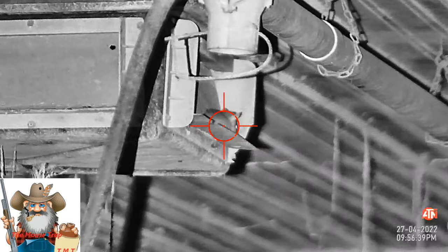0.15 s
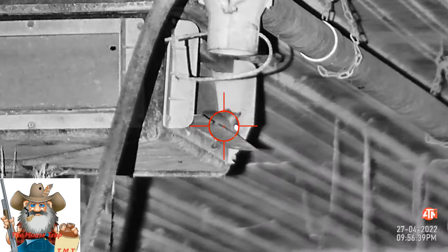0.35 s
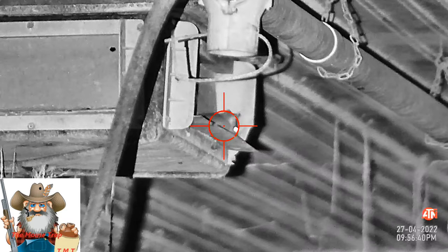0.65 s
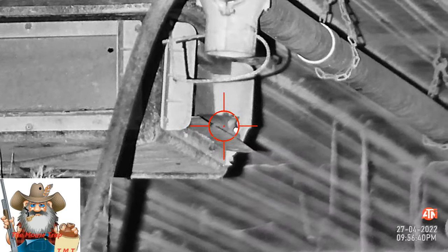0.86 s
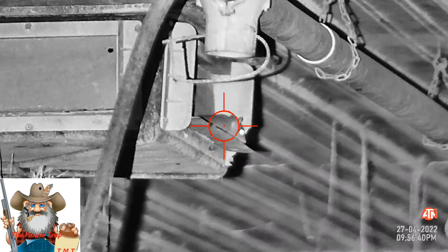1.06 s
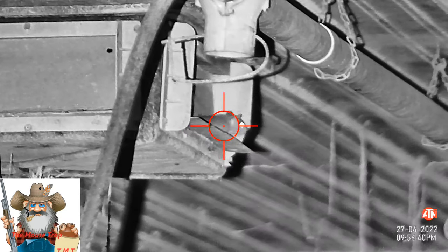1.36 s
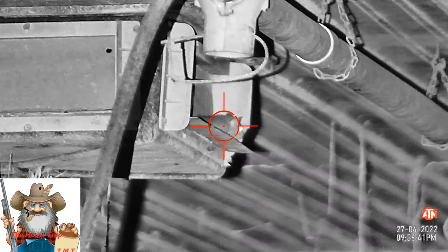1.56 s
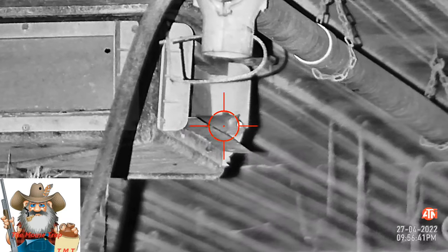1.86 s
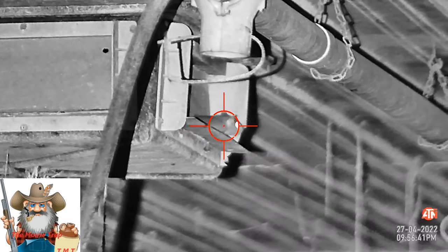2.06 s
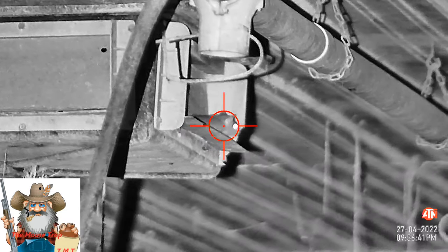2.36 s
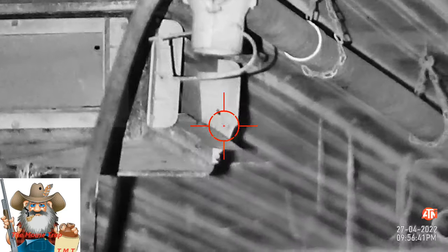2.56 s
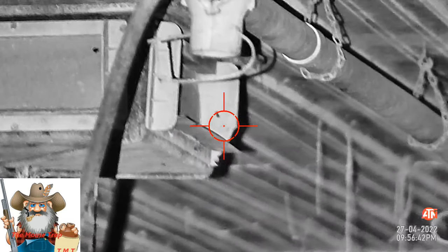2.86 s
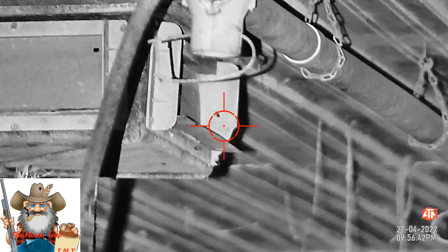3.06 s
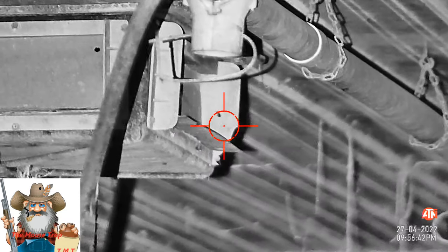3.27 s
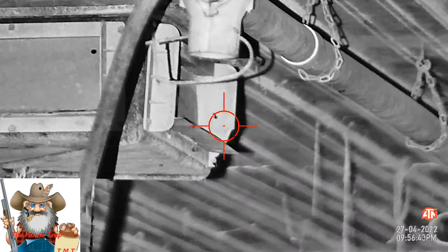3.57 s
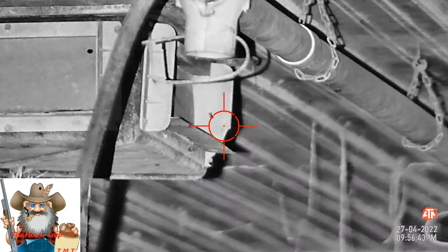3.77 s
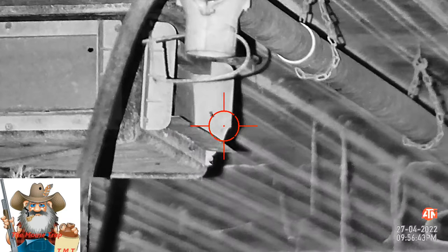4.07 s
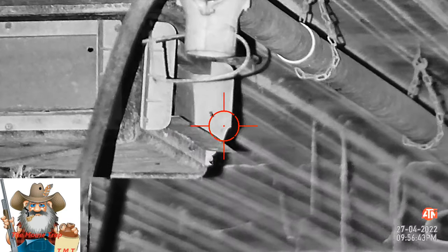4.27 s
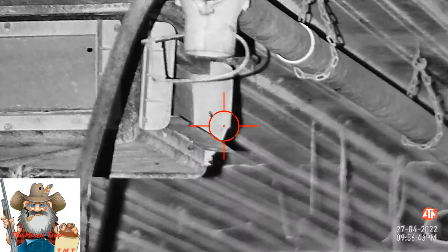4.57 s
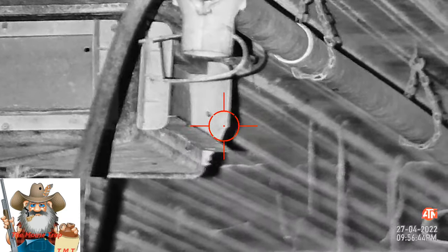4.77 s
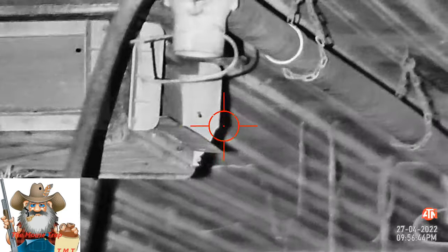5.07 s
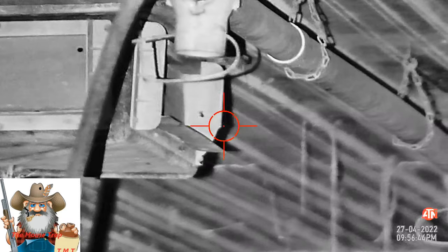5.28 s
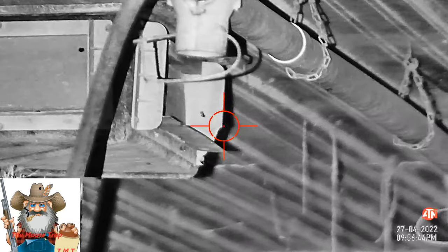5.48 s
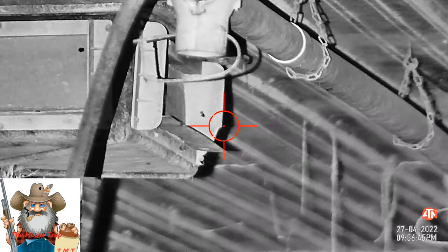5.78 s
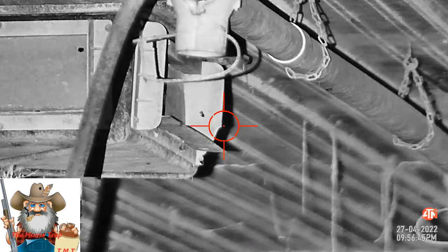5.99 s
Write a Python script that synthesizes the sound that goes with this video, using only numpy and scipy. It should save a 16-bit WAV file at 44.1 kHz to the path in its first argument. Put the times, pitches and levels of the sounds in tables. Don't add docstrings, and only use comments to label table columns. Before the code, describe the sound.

An air rifle cracks once inside a big metal barn, with small clinks and sliding sheet before, pellet smack, ringing tail and scuffling after.

```python
import sys
import numpy as np
from scipy import signal
from scipy.fft import rfft, irfft
from scipy.io import wavfile
from scipy.ndimage import uniform_filter1d

SR = 44100
rng = np.random.default_rng(int(sys.argv[2]) if len(sys.argv) > 2 else 0)


def store_pcm(level_fs):
    pcm = np.round(np.clip(level_fs, -1, 1) * 32767).astype(np.int16)
    wavfile.write(sys.argv[1], SR, np.atleast_2d(pcm).T)


def invert_db(x):
    u = np.asarray(x, float) / 20
    return 10 ** u


N = 270856

# start_s, peak_db, rise_s, hold_s, t60_s
AFTERSHOT = [
    (2.466, -19.5, 0.0022, .001, 0.018),
    (2.47, -30, 0.0039, .001, 0.28),
    (2.505, -36, .022, 0.2, .3),
    (2.515, -42, 0.014, .005, .3),
]
IMPACT = [
    (2.695, -24.5, 0.007, 0.044, 0.49),
    (2.75, -42, 0.04, 0.017, 1.37),
]
SLIDE = [
    (1.926, -49, 0.0024, 0.017, .3),
    (1.935, -34, 0.059, 0.022, 0.63),
    (2.1, -63.5, 0.16, .05, 1.6),
]
# start_s, peak_db, rise_s, t60_s, brightness_db
SCUFFLE = [(0.01, -59, 0.022, 1.5, -3), (.135, -63, 0.0072, 1.7, -1), (.34, -59, 0.023, 1.5, 5),
           (.49, -75, .02, .3, 6.5), (.565, -58, 0.027, 0.16, 2.5), (.88, -62, 0.16, 2.5, -7),
           (1.19, -58, 0.024, 1.7, -14.5), (1.32, -59.5, 0.026, 1.1, -3.5), (1.67, -63, 0.036, 1.4, -9),
           (2.35, -59, 0.038, 0.28, 6), (3.14, -55.5, 0.067, 1.9, 0), (3.39, -56, 0.024, 1.5, 4),
           (3.52, -58, 0.055, 3.6, 7.5), (4.04, -56.5, 0.072, 1.1, 9), (4.234, -60.5, 0.018, 8.9, 11),
           (4.59, -53, 0.017, 1.6, 5), (4.67, -51.5, 0.055, 3.7, 5.5), (4.818, -45.5, 0.041, 1.04, 3.5),
           (5.018, -47, 0.059, 1.84, -6.5), (5.31, -57.5, 0.046, 0.19, 5), (5.5, -60, 0.068, 2.6, 3.5),
           (5.685, -51.5, 0.013, 2.4, -7), (5.93, -53, 0.045, 2.4, -0.5), (6.0, -51, 0.065, 0.7, -4.5)]


def rms_one(x):
    return x / np.sqrt(np.mean(x ** 2) + 1e-20)


def filtered(x, order, hz, kind="low"):
    return signal.sosfilt(signal.butter(order, hz, kind, fs=SR, output="sos"), x)


def at_hz(points, hz):
    points_hz, points_db = np.transpose(points)
    return np.interp(np.log(hz), np.log(points_hz), points_db)


def place(out, s, piece):
    i = round(s * SR)
    return out + np.pad(piece, (i, N))[:N]


def ring(clicks, hz, t60):
    r, w = invert_db(-60 / (t60 * SR)), 2 * np.pi * hz / SR
    return signal.lfilter([0, np.sin(w)], [1, -2 * r * np.cos(w), r * r], clicks + 1e-18)


def drift(rate):
    knots = rng.standard_normal(N // 64 + 2000)
    r = np.exp(-128 * np.pi * rate / SR)
    slow = signal.lfilter([1], [1, -2 * r, r * r], knots)[1998:]
    return np.interp(np.arange(N) / 64, np.arange(len(slow)), rms_one(slow))


def swells(rows):
    rise_power, ageing_stops_s = 1.3, 0.35
    s, peak_db, rise, hold, t60 = np.transpose(rows)[:, :, None]
    age = np.arange(0, N + 64, 64) / SR - s
    rising_db = 20 * rise_power * np.log10(np.clip(age / rise, 1e-9, 1))
    falling_db = 60 * np.maximum(age - rise - hold, 0) / t60
    return peak_db + rising_db - falling_db, np.clip(age, 0, ageing_stops_s)


def scuffle_swells():
    return [(s, db, rise, 0, t60) for s, db, rise, t60, _ in SCUFFLE]


def full_rate(power):
    return np.interp(np.arange(N) / 64, np.arange(power.shape[1]), power.sum(axis=0))


def blows():
    blow_s = [2.4428, 2.4445, 2.4462, 2.4519, 2.4542, 2.4570, 2.4596, 2.4659, 2.4688, 2.4971, 2.4982,
              2.5253, 2.6014, 2.6962, 2.4404, 2.4745, 2.4622, 2.4478]
    # peak_db, ring_hz, ring_t60_s, spray_minus_ring_db
    blow_rings = [(-13.5, 2000, 0.043, 3.5), (8, 4100, 0.0096, -15), (-0.5, 2600, 0.011, -6.5),
                  (6.5, 4000, 0.0097, 10.5), (-0.5, 4400, .010, 0.5), (-5.5, 6000, .011, 5.5),
                  (2, 2350, 0.008, 3), (0, 5000, 0.0085, 3), (-14, 4200, 0.02, 6),
                  (-12.5, 6800, 0.017, 0.5), (-13, 3300, 0.010, 3), (-22, 2300, .019, 0),
                  (-23, 5000, 0.035, 5), (-15.5, 2000, 0.029, 1.5), (-43, 4000, .05, 7.5),
                  (-22, 2100, 0.047, -5.5), (-13.5, 3500, 0.016, 6), (-4.5, 1900, 0.0097, -7)]
    spray_cut_hz, db_per_octave = 11000, 21.5
    out, t = np.zeros(N), np.arange(4000) / SR
    for s, (peak_db, hz, t60, spray_db) in zip(blow_s, blow_rings):
        cut_hz = spray_cut_hz * 2 ** ((peak_db + spray_db) / db_per_octave)
        noise = rng.standard_normal((2, len(t)))
        decay = invert_db(-60 * t / t60) * np.minimum(t / 0.00018, 1)
        wobble = 0.16 * np.cumsum(signal.lfilter([.1], [1, -.9], noise[0]))
        tone = np.sin(2 * np.pi * hz * t + wobble)
        spray = rms_one(filtered(noise[1], 2, [1500, min(cut_hz, 18000)], "band"))
        out = place(out, s, invert_db(peak_db) * decay * (tone + invert_db(spray_db) * spray * .5))
    return out


def stock_and_barrel():
    # mode_hz, level_db, t60_s
    stock_modes = [(65, -48.5, 0.08), (170, -47, 0.083), (310, -40, 0.019), (409.4, -14, 0.04),
                   (560, -20, .035), (720, -16, 0.045), (1750, -24.5, 0.06)]
    # time_s, level_db
    barrel_level = [(2.477, -36.5), (2.49, -42.5), (2.536, -50), (2.69, -47), (2.71, -43), (2.74, -47.5),
                    (2.76, -54)]
    stock_s, barrel_hz = 2.4525, 443.2
    push = place(np.zeros(N), stock_s, np.ones(1))
    thump = sum(invert_db(db) * ring(push, hz, t60) for hz, db, t60 in stock_modes)
    thump = filtered(thump, 2, 45, "high")
    s, db = np.transpose(barrel_level)
    t = np.arange(N) / SR
    knots_s = np.r_[s[0] - .02, s, s[-1] + .08]
    knots_db = np.r_[db[0] - 6, db, -90]
    level = invert_db(np.interp(t, knots_s, knots_db, left=-200, right=-200))
    return thump + np.sqrt(2) * level * np.sin(2 * np.pi * barrel_hz * t)


def rings(rows, peaks, share_db):
    noise, out = rng.standard_normal(N), 0
    for k, (hz, width, db) in enumerate(peaks):
        r = np.exp(-np.pi * width / SR)
        poles = [1, -2 * r * np.cos(2 * np.pi * hz / SR), r * r]
        line = signal.lfilter([(1 - r * r) / 2, 0, (r * r - 1) / 2], poles, noise)
        out = out + (-1) ** k * invert_db(db) * line
    level_db, _ = swells(rows)
    return rms_one(out) * invert_db(share_db) * np.sqrt(full_rate(invert_db(2 * level_db)))


def roof_boom():
    # centre_hz, level_db, t60_s
    roof_band = (96, -70.5, 5.4)
    start_s = 2.76
    hz, db, t60 = roof_band
    t = np.maximum(np.arange(N) / SR - start_s, 0)
    low = filtered(rng.standard_normal(N), 2, [hz / 1.11, hz * 1.23], "band")
    return invert_db(db) * rms_one(low) * invert_db(-60 * t / t60) * np.minimum(t / 0.05, 1)


def ringing_sheets():
    # line_hz, width_hz, level_db
    aftershot_lines = [(1640, 160, -4), (2230, 100, -4.5), (2920, 30, -10.5), (3240, 76, -1.5),
                       (4150, 80, -12), (4600, 50, -5.5), (5420, 130, -3.5), (6120, 130, -3),
                       (6570, 100, 3), (7350, 46, -4.5), (8220, 99, -6.5)]
    # line_hz, width_hz, level_db
    impact_lines = [(636, 28, -6.5), (755, 100, -6), (1100, 75, -2.5), (1824, 88, -3), (2354, 88, -2),
                    (2600, 28, -9), (3010, 50, -4), (3800, 51, -1), (4870, 41, -14.5), (5410, 93, -6),
                    (6260, 97, -6), (7420, 120, -7.5)]
    # line_hz, width_hz, level_db
    slide_lines = [(1780, 120, 2.5), (2306, 200, -6.5), (2830, 61, -1), (3760, 45, -6.5), (5900, 56, -3.5),
                   (6530, 83, -9.5), (6800, 300, -5.5)]
    # line_hz, width_hz, level_db
    scuffle_lines = [(600, 66, -2.5), (700, 54, 1.5), (990, 180, -1), (2210, 180, -2), (3000, 20, -7),
                     (4080, 86, 0), (4600, 31, -6.5), (6900, 340, -3), (7850, 150, -7)]
    out = rings(AFTERSHOT, aftershot_lines, share_db=0.5)
    out = out + rings(IMPACT, impact_lines, share_db=-3)
    out = out + rings(SLIDE, slide_lines, share_db=-2.5)
    return out + rings(scuffle_swells(), scuffle_lines, share_db=-6.5)


def bursts(events, spread, offset_db, rise_s):
    out, t = np.zeros(N), np.arange(20000) / SR
    for s, db, hz, t60 in events:
        band = [hz / spread, min(hz * spread, 18000)]
        noise = rms_one(filtered(rng.standard_normal(len(t)), 2, band, "band"))
        shape = invert_db(-60 * t / t60) * np.minimum(t / rise_s, 1)
        out = place(out, s, invert_db(db + offset_db) * noise * shape)
    return out


def far_contacts():
    # start_s, peak_db, pitch_hz, t60_s
    echoes = [(2.7035, -15.5, 2800, 0.039), (2.713, -13.5, 2400, 0.062), (2.7005, -19.5, 6500, 0.052),
              (2.7185, -18.5, 5500, .04), (2.731, -14.5, 2700, 0.056), (2.746, -14.5, 4000, .05),
              (2.7625, -18.5, 5500, 0.055), (2.777, -21, 3200, .05), (2.803, -23, 4500, .05),
              (2.537, -27.5, 5500, .04), (2.559, -21, 3200, .04), (2.578, -28.5, 6000, .04),
              (2.625, -21, 1700, .05), (2.645, -32, 3000, .04), (2.668, -29, 6000, .04)]
    # start_s, peak_db, pitch_hz, t60_s
    slide_knocks = [
        (1.924, -27, 990, 0.055),
        (1.9465, -26, 11900, 0.21),
        (1.9607, -24, 4890, .13),
        (1.9805, -16, 1780, 0.061),
        (2.0003, -18.5, 1800, 0.082),
    ]
    # start_s, peak_db, pitch_hz
    far_ticks = [(0.149, -43, 2160), (.32, -47, 8000), (0.3538, -36, 4870), (.418, -39, 7850),
                 (.443, -31.5, 8100), (.735, -39, 7200), (.8894, -44, 2170), (1.2278, -39, 3010),
                 (1.3385, -40, 4040), (1.8664, -41, 6770), (2.3895, -43, 1640), (3.4067, -34, 4080),
                 (3.515, -38, 5430), (3.5648, -36.5, 6570), (3.584, -44, 4500), (3.6458, -42, 3000),
                 (3.781, -39, 1465), (4.121, -31.5, 6850), (4.3587, -34, 6600), (4.515, -45, 1980),
                 (4.5575, -41, 1760), (4.6079, -30, 4200), (4.8513, -49, 4620), (4.875, -32.5, 805),
                 (4.875, -26, 10000), (4.895, -25.5, 9500), (4.848, -36, 8000), (4.98, -35, 7500),
                 (5.5505, -46, 1770), (5.6994, -41, 1790), (5.7474, -33, 6600), (5.9514, -36.5, 3560),
                 (.035, -50, 11500), (.15, -42, 10500), (.36, -51, 11000), (.89, -48, 11000),
                 (1.212, -42, 7800), (1.55, -48, 7000), (1.597, -50, 8500), (1.67, -49, 11000),
                 (1.868, -45, 11500)]
    # start_s, peak_db, pitch_hz, t60_s
    swishes = [(0.566, -44, 6300, 0.35), (0.574, -50, 300, 0.2), (.89, -51, 340, 0.59),
               (.89, -49.5, 850, 0.72), (1.79, -54, 320, 0.37), (2.86, -38.5, 13250, 2.8),
               (4.86, -40.5, 490, 0.58), (5.28, -56, 173, 0.7), (5.085, -46, 4200, .4),
               (6.1, -48, 1700, 0.56)]
    # start_s, level_db, pitch_hz, t60_s
    streaks = [(.94, -57.5, 1100, 0.54), (1.225, -57.5, 710, 0.36), (1.225, -58, 3000, 0.41),
               (1.225, -57, 3930, 0.39), (1.335, -54.5, 4050, 0.59), (1.34, -59, 5050, 0.51),
               (1.755, -60, 930, 0.31), (2.95, -61, 416, 0.97), (2.95, -66.5, 583, 8.3),
               (4.86, -49, 4570, .25), (4.87, -45, 2400, 0.24), (5.95, -63, 1900, .8),
               (2.59, -42, 1610, 0.34), (2.535, -42, 3130, .3), (.565, -58, 6800, .3), (.57, -59, 8000, .3),
               (1.24, -57, 2130, 0.44), (1.36, -56, 2940, 0.56), (2.7, -37, 1070, .5)]
    tick_t60_s = 0.15
    broad = [(s, db, hz, tick_t60_s) for s, db, hz in far_ticks]
    broad = broad + list(swishes) + list(slide_knocks) + list(echoes)
    broad_noise = bursts(broad, spread=1.35, offset_db=-13, rise_s=.003)
    return broad_noise + bursts(streaks, spread=1.045, offset_db=0, rise_s=.03)


def fitting():
    # start_s, peak_db
    touches = [(0.418, -43), (.437, -38.5), (.4405, -32.5), (.45, -36), (.464, -49), (.7303, -32),
               (.7325, -37), (.736, -35), (.742, -52), (.749, -60), (1.135, -45.5), (1.226, -42.5),
               (1.25, -45), (1.55, -49), (1.7, -49)]
    # mode_hz, level_db, t60_s
    modes = [(1800, -10, 0.025), (1980, -3, 0.037), (2110, -7, 0.058), (2170, 2, 0.045),
             (2250, -2.5, 0.018), (4050, -4, 0.0098), (4320, -8, .03), (4700, -9.5, .025),
             (3130, -15, .012), (7900, -16, .02), (9500, -19, 0.02), (10600, -13, 0.022), (2700, -9, 0.013),
             (5400, -16, .015), (996, -15, 0.037)]
    start_s, peak_db = np.transpose(touches)
    at = (start_s * SR).astype(int)
    luck = rng.normal(0, 1, (len(at), len(modes)))
    t = np.arange(300) / SR
    out = np.zeros(N)
    for k, (hz, db, t60) in enumerate(modes):
        clicks = np.zeros(N)
        clicks[at] = invert_db(peak_db + db - 16.5 + 1.4 * luck[:, k])
        rattle = np.cos(2 * np.pi * hz * t) + 0.39 * rng.standard_normal(300)
        rattle = rattle * invert_db(-60 * t / 0.0077)
        drive = abs(np.sum(rattle * np.exp(-2j * np.pi * hz * t)))
        rattle = 3.96 * rattle / drive
        out += ring(np.convolve(clicks, rattle)[:N], hz, t60)
    return out


def barn(x):
    t60_s, level_db = 0.29, -8.5
    t = np.arange(SR) / SR
    tail = rng.standard_normal(SR) * invert_db(-60 * t / t60_s) * np.minimum(t / 0.014, 1)
    return invert_db(level_db) * signal.fftconvolve(x, tail / np.sqrt(np.sum(tail ** 2)))[:N]


def squeal():
    # from_hz, to_hz, width_hz, level_db
    climb = (5903, 7403, 450, -59)
    start_s, length_s = 3.955, 0.175
    from_hz, to_hz, width_hz, db = climb
    share = np.arange(int(length_s * SR)) / (length_s * SR)
    flutter = rms_one(filtered(rng.standard_normal((2, len(share))), 2, width_hz))
    phase = 2 * np.pi * np.cumsum(from_hz + (to_hz - from_hz) * share) / SR
    shape = np.minimum(share / 0.18, 1) * np.minimum((1 - share) / .1, 1)
    hiss = flutter[0] * np.cos(phase) + flutter[1] * np.sin(phase)
    return place(np.zeros(N), start_s, invert_db(db) * shape * hiss)


def band_power(rows, colour, ageing, hz, bass_db=0, treble_db=0):
    level_db, age = swells(rows)
    reference = np.mean(invert_db(2 * at_hz(colour, np.linspace(1500, 5000, 40)))) * 3500
    low_share = np.clip(np.log2(1800 / hz), 0, 1)
    high_share = np.clip(np.log2(hz / 4200) / 1.6, 0, 1)
    bass_tilt_db = low_share * (bass_db + ageing[0] + ageing[1] * age)
    treble_tilt_db = high_share * (treble_db + ageing[2] + ageing[3] * age)
    return invert_db(2 * (level_db + bass_tilt_db + treble_tilt_db + at_hz(colour, hz))) / reference


def barn_wash(grain_db, patchy_db):
    # pitch_hz, density_db (dB per Hz)
    aftershot_colour = [(60, -29), (200, -24), (350, -18), (520, -11), (1310, -13.5), (1630, -7.5),
                        (2170, -9.5), (3160, -1.5), (3860, -9.5), (6670, -2), (7270, -8), (15600, -10.5),
                        (16200, -18.5)]
    impact_colour = [(59, -65), (100, -29), (306, -16.5), (439, -11.5), (590, -13.5), (1090, -17.5),
                     (1320, -7.5), (3000, 1), (6560, -5.5), (14000, -19), (15600, -17.5)]
    slide_colour = [(59, -63), (100, -31.5), (320, -26), (395, -44.5), (566, -17), (1340, -6), (1850, -6),
                    (2010, -1.5), (6840, -7), (13200, -12.5), (15600, -22)]
    scuffle_colour = [(59, -53), (100, -14), (300, -9), (379, -1.5), (699, -2), (1320, -3), (2590, -2.5),
                      (8100, -5), (10700, -12.5), (13700, -5.5), (15600, -14.5)]
    hiss_colour = [(18, 8.5), (30, -4), (123, -13), (325, -8), (693, -8.5), (1080, -7.5), (1330, -13),
                   (2080, -4.5), (3250, -13), (4220, -9), (11400, -16), (13100, -17), (14800, -11.5),
                   (15600, -11)]
    # bass_start_db, bass_db_per_s, treble_start_db, treble_db_per_s
    aftershot_ageing = (1.5, -17, 6.5, -56)
    impact_ageing = (0, 26, 0.5, -9)
    slide_ageing = (3.5, 4.5, 3.5, -59.5)
    scuffle_ageing = (-9, 9.5, -0.5, -16)
    hiss_db, scuffle_treble_db = -60.5, -4
    bright_db = np.array(SCUFFLE)[:, -1:]
    thin_db = -0.12 * bright_db
    parts = [(SLIDE, slide_colour, slide_ageing), (AFTERSHOT, aftershot_colour, aftershot_ageing),
             (IMPACT, impact_colour, impact_ageing)]
    grains = rng.standard_normal((2, N)) * invert_db(grain_db * np.minimum(rng.exponential(1, (2, N)), 4))
    grains = rms_one(grains)
    edges = np.r_[25 * 2 ** np.arange(-4 / 3, 9, 1 / 3), 13500, 14100, 14800, 15400, 16000]
    hiss_total = np.trapezoid(invert_db(2 * at_hz(hiss_colour, np.arange(30, 15800.))))
    out, together, gusts = np.zeros(N), drift(25), drift(7.5)
    for k, (low, high) in enumerate(zip(edges, edges[1:])):
        hz = np.sqrt(low * high)
        band = rms_one(filtered(grains[k % 2], 3, [low, high], "band"))
        far = band_power(scuffle_swells(), scuffle_colour, scuffle_ageing, hz,
                         thin_db, scuffle_treble_db + bright_db)
        moving = full_rate(np.vstack([far] + [band_power(*part, hz) for part in parts]))
        moving = moving * invert_db(2 * patchy_db * (together + drift(23.0)))
        lumps_db = 2.0 * gusts * (hz < 110)
        steady = invert_db(2 * (hiss_db + at_hz(hiss_colour, hz) + lumps_db)) / hiss_total
        out += band * np.sqrt((moving + steady) * (high - low))
    return out


def whine():
    centre_hz, half_width_hz, wander_hz = 14120, 430, 120
    level_db, flicker_db = -65.5, 2.2
    flutter = rms_one(filtered(rng.standard_normal((2, N)), 6, half_width_hz))
    pitch_hz = centre_hz + wander_hz * (drift(2.5) + .7 * drift(15))
    phase = 2 * np.pi * np.cumsum(pitch_hz) / SR
    hiss = flutter[0] * np.cos(phase) + flutter[1] * np.sin(phase)
    return invert_db(level_db + flicker_db * drift(12)) * hiss


def side_rumble():
    level_db, corner_hz = -75.5, 30
    pole = np.exp(-2 * np.pi * corner_hz / SR)
    rumble = rms_one(signal.lfilter([1], [1, -pole], rng.standard_normal(N)))
    return invert_db(level_db) * filtered(rumble, 4, 900)


def scene():
    crack = filtered(blows(), 2, 600, "high")
    clinks = fitting()
    mid = crack + stock_and_barrel() + ringing_sheets() + roof_boom()
    mid = mid + far_contacts() + clinks + barn(clinks) + squeal()
    mid = mid + barn_wash(grain_db=0.0, patchy_db=0.9) + whine()
    leak = invert_db(-19.5) * filtered(mid, 2, 300)
    side = side_rumble() + leak
    return np.array([mid + side, mid - side])


def flipped_treble(mid, from_level_db, burst_db, chance, depth, burst_share):
    flip_edges = [8950, 9650, 10350, 11000, 11700, 12400, 12950, 13500, 14500]
    frames = np.arange(N // 1024 + 2) * 1024
    level_db = 10 * np.log10(uniform_filter1d(np.pad(mid, (0, 2048)) ** 2, 2048) + 1e-12)
    odds = chance * np.clip((level_db[frames] - from_level_db) / 15, 0, 1)
    odds = odds * (level_db[frames] < burst_db)
    spectrum, hz, out = rfft(mid), np.arange(N // 2 + 1) * SR / N, np.zeros(N)
    for low, high in zip(flip_edges, flip_edges[1:]):
        flip = np.interp(np.arange(N), frames, rng.random(len(frames)) < odds)
        out += depth * flip * irfft(spectrum * (hz >= low) * (hz < high), N)
    smeared = mid - 1.4 * np.roll(mid, 40)
    treble = irfft(rfft(smeared) * np.clip((hz - 7600) / 1500, 0, 1), N)
    return out + burst_share * treble * np.clip((level_db[:N] - burst_db) / 3, 0, 1)


def roll_off(x):
    return signal.sosfilt(signal.butter(12, 15780, fs=SR, output="sos"), x)


def record(dry):
    overloaded = dry / (1 + np.abs(dry / .97) ** 8) ** (1 / 8)
    bass_made = filtered(overloaded - dry, 1, 900)
    overloaded = overloaded - bass_made
    in_burst = uniform_filter1d(dry ** 2, 400) > .03
    loud_bass = filtered(overloaded * in_burst, 1, 220)
    left, right = overloaded - np.array([[.92], [.85]]) * loud_bass
    flipped = flipped_treble((left + right) / 2, from_level_db=-46, burst_db=-19,
                             chance=.16, depth=.9, burst_share=.2)
    sides = np.array([left, right - 2 * flipped])
    cut = signal.sosfilt(signal.cheby2(10, 50, 16300, fs=SR, output="sos"), sides)
    mix = np.clip(cut, -1, 1)
    return roll_off(mix)


dry = scene()
out = record(dry)
store_pcm(out)
```